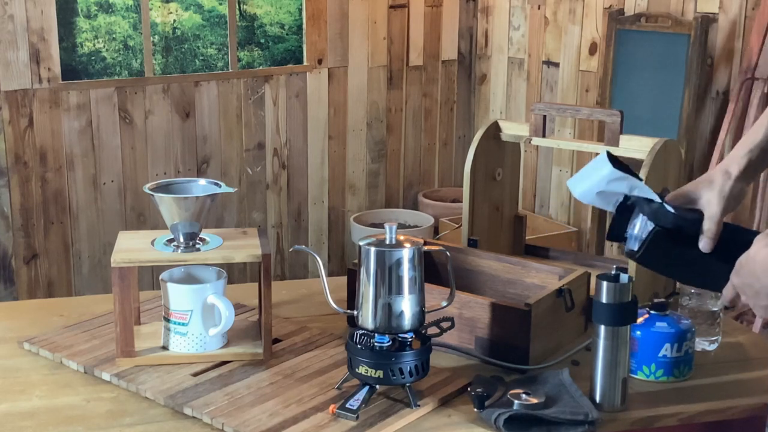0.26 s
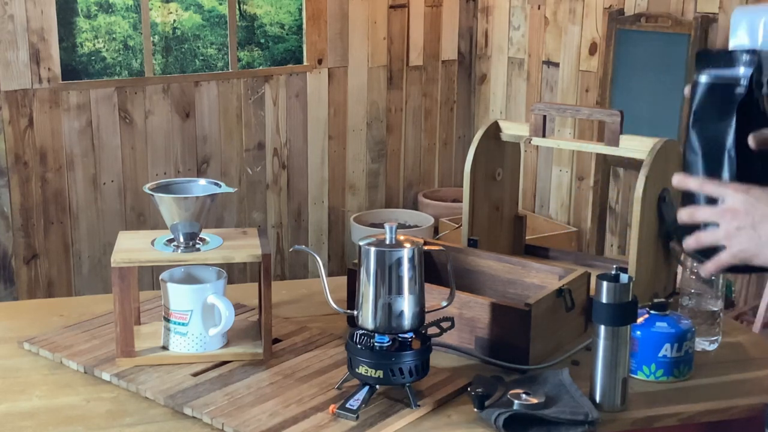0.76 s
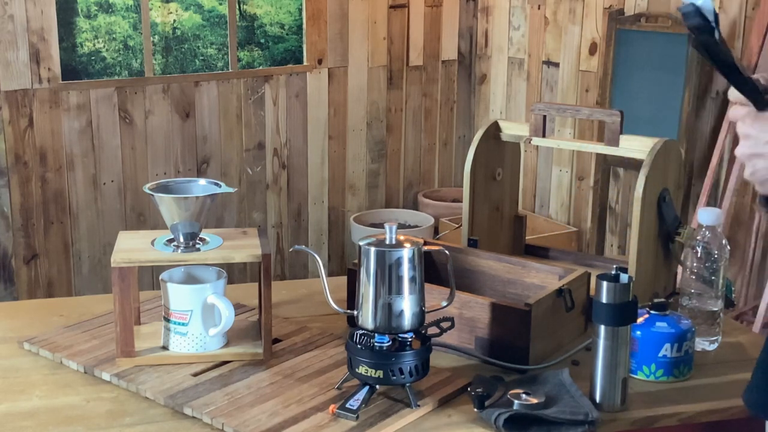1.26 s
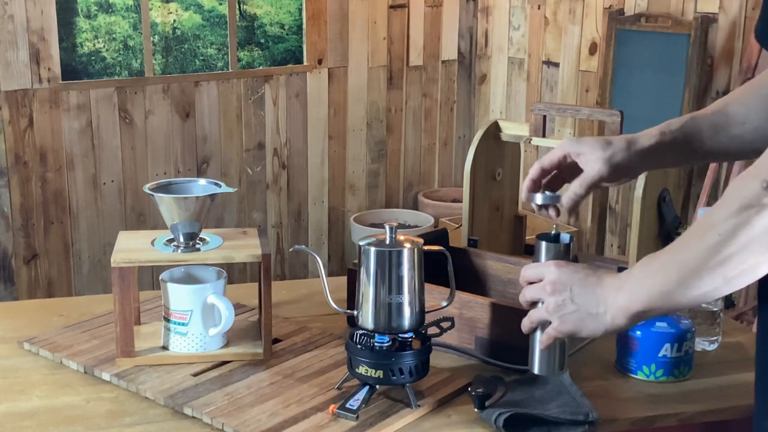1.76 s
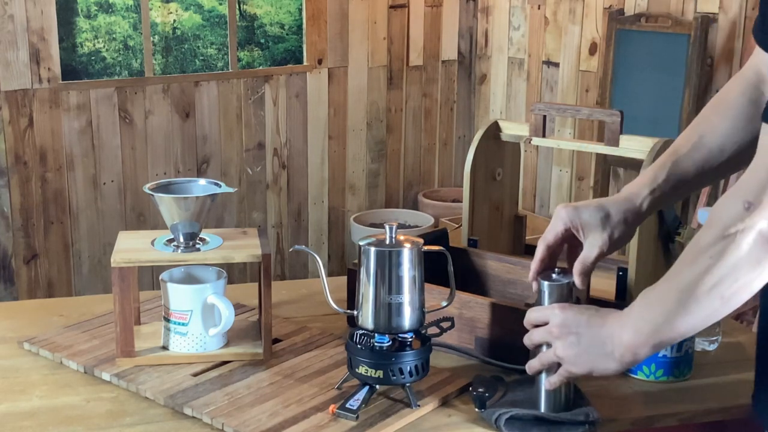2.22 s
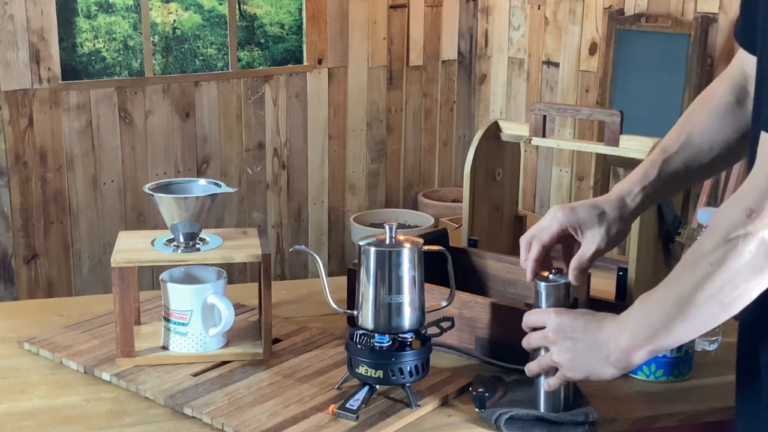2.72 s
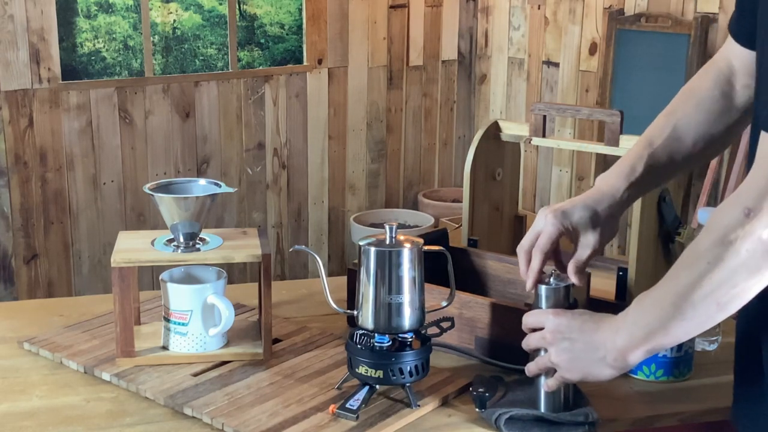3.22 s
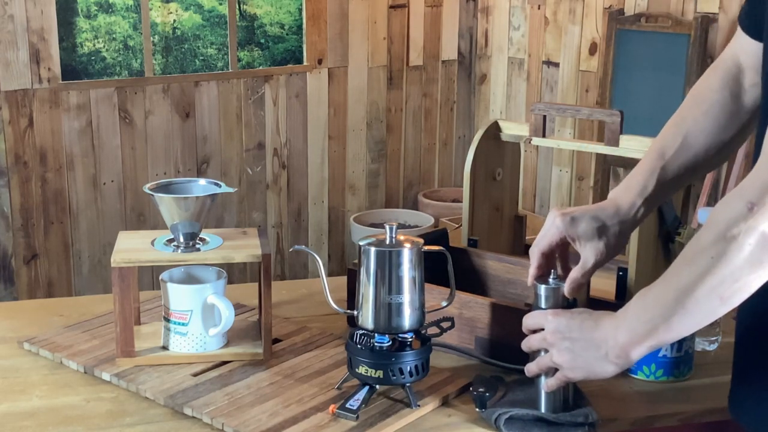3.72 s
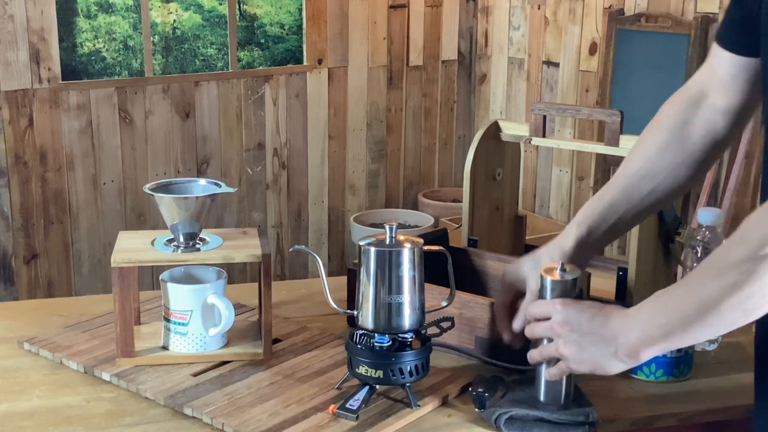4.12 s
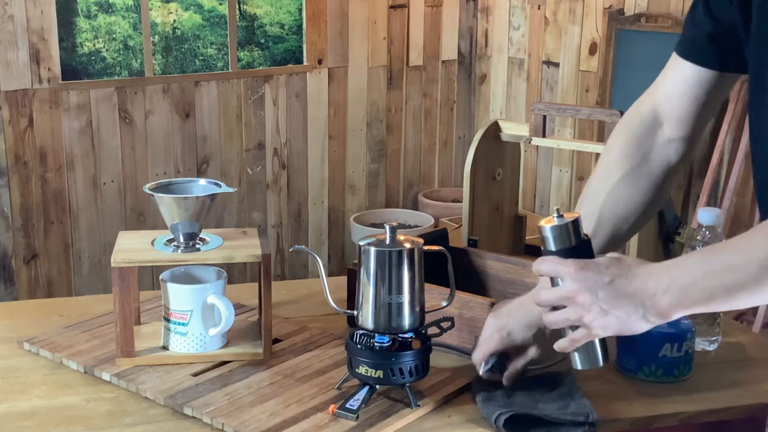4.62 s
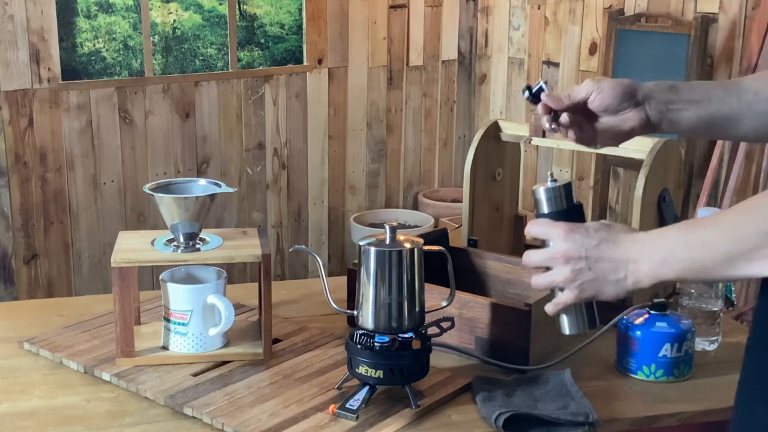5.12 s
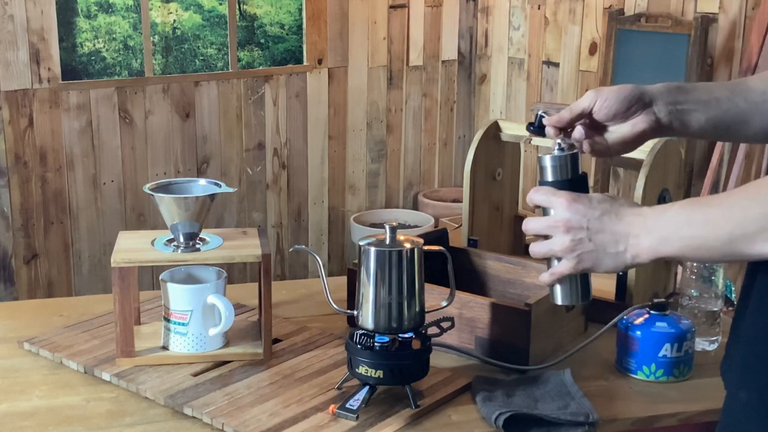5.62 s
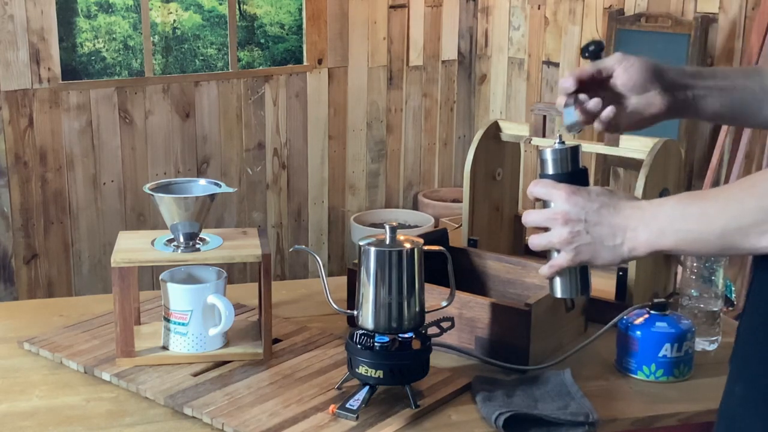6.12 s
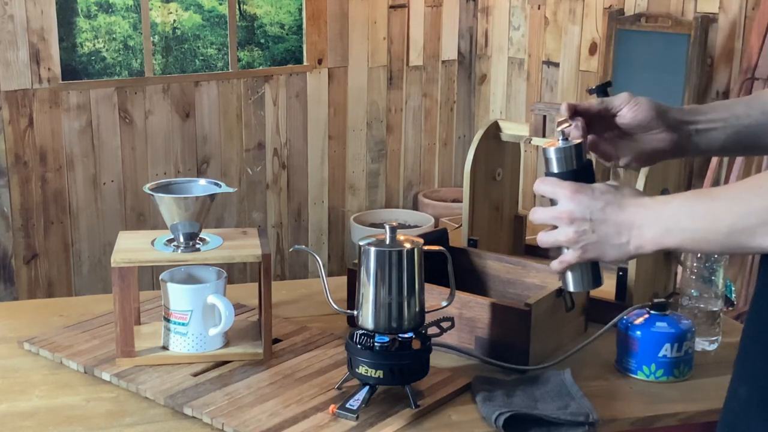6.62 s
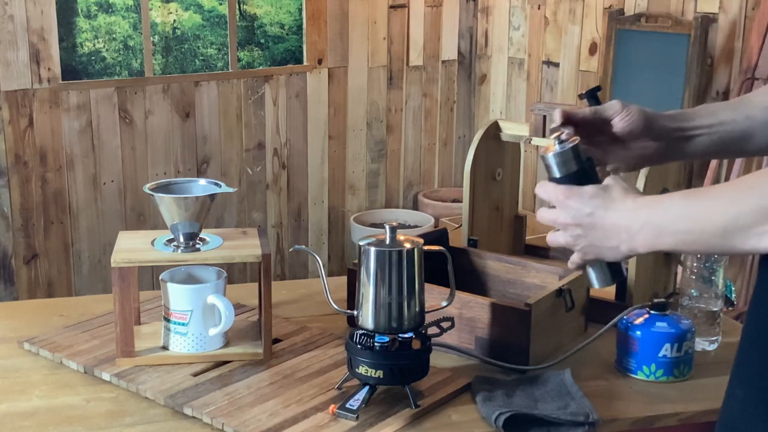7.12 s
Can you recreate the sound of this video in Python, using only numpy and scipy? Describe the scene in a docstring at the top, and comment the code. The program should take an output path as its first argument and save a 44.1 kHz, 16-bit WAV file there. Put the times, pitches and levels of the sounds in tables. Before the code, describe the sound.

Coffee beans rush down a foil bag, the bag crinkles sharply and cuts off, then a metal grinder lid scrapes, clicks and its crank clinks on.

```python
"""Coffee bag and hand grinder

Beans slide down a foil-lined bag as it is tipped upright: filtered trains of tiny impacts. The bag crinkles
in runs of snaps until its sound cuts off. A steel lid is then fitted on a grinder and its crank clinked onto
the shaft: noisy contacts excite banks of dying modes. A small wood-panelled room adds random echoes; under
it all lie steady rumble and faint hiss, with a brief low tone at the start. Both channels are alike."""
import sys
import numpy as np
from scipy import signal
from scipy.io import wavfile
from scipy.ndimage import uniform_filter1d

SR = 44100
rng = np.random.default_rng(int(sys.argv[2]) if len(sys.argv) > 2 else 0)


def dump(signal):
    """Clip the signal to [-1, 1] and save it as 16-bit WAV at the path in sys.argv[1]."""
    limited = np.clip(np.atleast_2d(signal).T, -1, 1)
    pcm = np.round(limited * 32767).astype(np.int16)
    wavfile.write(sys.argv[1], SR, pcm)


N = 324576
TIME = np.arange(N) / SR

# Spectrum of the lid touching the tube. Each row: frequency in Hz, relative level in dB.
LID_CONTACT_SPECTRUM = [(300, -41), (850, 1), (1500, -0.5), (2000, 3.5), (2400, 3), (2850, 2.5),
                        (3500, 0.5), (4600, 2.5), (6000, -2.5), (7000, -8), (9500, -15.5), (12000, -19),
                        (15500, -28)]
# Modes of lid and tube. Each row: frequency in Hz, T60 in s, relative level in dB while loose, in dB once seated.
LID_TUBE_MODES = [(1270, 0.048, -1.5, -24), (2900, 0.031, -3.5, -7), (4030, 0.066, 9.5, -20),
                  (4480, .03, -12, 7), (5910, 0.066, -18, 4), (8340, .04, -7, -27), (8500, .35, -44, 2.5),
                  (9420, 0.055, -9, -17), (11050, 0.19, -18, 1), (14000, .05, -15, -17),
                  (14920, .02, -40, 1)]
# Spectrum of the wooden table. Each row: frequency in Hz, relative level in dB.
TABLE_SPECTRUM = [(110, 3), (200, 2), (280, -2.5), (450, -5.5), (780, 1), (1100, -3), (1600, -36),
                  (4000, -31)]
RING_FOLLOWS_TILT = 0.4  # share of the contact's tilt passed on to the lid's modes


def beans():
    """Beans tumble in clumps and tick; the steeper the bag, the more they hiss on foil and drum on its bottom."""
    # Bean impact spectrum. Each row: frequency in Hz, relative level in dB.
    bean_spectrum = [(250, -7), (450, -8), (750, -1.5), (1100, -3), (1500, -5.5), (2200, -5.5), (3200, -14),
                     (5500, -14), (7000, -20), (13500, -21.5), (16000, -28)]
    # Growing surges of beans. Each row: start in seconds, length in seconds, flow level in dB.
    surges = [(.39, .01, -46.5), (.515, 0.02, -36), (.665, 0.03, -33)]
    # Tilt of the bag. Each row: time in seconds, share from 0 (lying) to 1 (upright).
    tipping = [(.5, 0.14), (.72, 1)]
    # dB relative to the flow: bag lying, bag upright; the hiss reaches this at the peak flow
    hiss_db, drum_db = (-22, -12.5), (-13, -5.5)
    hiss_growth = 0.2  # extra dB of hiss per dB of flow

    flow = strokes(surges, rise_db_per_s=90, fall_db_per_s=120)
    upright = np.interp(TIME, *np.transpose(tipping))
    bunching = clumps(depth_db=2.0, size=500)

    tick_grains = colour(grains(per_s=2200, spread_db=3.0), bean_spectrum)
    ticks = unit(bunching * band(tick_grains, 770, 6050))

    hiss_grains = colour(grains(per_s=4300, spread_db=3.0), bean_spectrum)
    hiss = unit(band(hiss_grains, 7500, 16400)) * (flow / flow.max()) ** hiss_growth

    drum_grains = colour(grains(per_s=1200, spread_db=-1), bean_spectrum)
    drum = unit(bunching * band(drum_grains, 230, 900))

    hiss_gain = amp(between(hiss_db, upright))
    drum_gain = amp(between(drum_db, upright))
    return flow * (amp(-3.5) * ticks + hiss_gain * hiss + drum_gain * drum)


def bag():
    """Stiff foil buckles in short runs of snaps, a fold setting off its neighbours, over fine crinkles."""
    # Foil spectrum. Each row: frequency in Hz, relative level in dB.
    foil_spectrum = [(200, -7), (500, -3.5), (750, 0.5), (1200, 1.5), (2100, 1), (3000, -2.5), (5300, -3.5),
                     (6600, -11.5), (10000, -17), (15500, -26.5)]
    # Snap runs. Each row: start in seconds, level in dB before trim, tilt in dB per octave, count of snaps.
    snap_runs = [(0.067, -46.5, 8.5, 1), (0.3224, -52, -6, 1), (.852, -32.5, -3.5, 2),
                 (0.9151, -34, -1.5, 2), (.9503, -30, -1.5, 1), (1.0837, -34.5, -1.5, 1),
                 (1.123, -36.5, -1, 1), (1.131, -32.5, -1.5, 1), (1.155, -28, 1, 1),
                 (1.1834, -25.5, 2.5, 3), (1.2447, -31.5, -2, 1), (1.2551, -31, 1, 1), (1.373, -33.5, 2, 2),
                 (1.455, -36, 3, 1), (1.463, -29.5, 1.5, 1), (1.476, -35, 5.5, 1)]
    # Squeezes by the hands. Each row: start in seconds, length in seconds, crinkle level in dB.
    squeezes = [(.945, .09, -41.5), (1.15, 0.1, -42.5), (1.378, 0.023, -45.5), (1.47, 0.009, -43),
                (1.565, .03, -47)]
    gap_s, step_db, trim_db = 0.0105, -2, -4.0  # from snap to snap in a run; all snaps

    bunching = clumps(depth_db=2.5, size=350)
    crinkles = unit(bunching * colour(grains(per_s=1200, spread_db=3), foil_spectrum))
    out = crinkles * strokes(squeezes, rise_db_per_s=224, fall_db_per_s=150)
    for s, db, tilt_db, count in snap_runs:
        for k in range(round(count)):
            snap = contact(foil_spectrum, tilt_db, chatter_s=0.0034, rough=2.9)
            add(out, s + k * gap_s, amp(db + trim_db + k * step_db) * snap)
    return out


def lid():
    """The lid knocks on the tube, rubs round and clicks home; its ring changes as it goes down."""
    # Depth of the lid. Each row: time in seconds, share from 0 (loose) to 1 (seated).
    seating = [(2.0, 0.1), (2.8, 0.34), (3.3, 0.96)]
    # Turns. Each row: start in seconds, length in seconds, touch level in dB, rub level at the end in dB,
    # ring in dB relative to touch or rub; contact and rub parts are trimmed later.
    turns = [(1.868, 0.024, -59, -61.5, 1), (1.966, 0.011, -46, -39.5, 1), (2.0545, .03, -44, -52, -9.5),
             (2.1435, 0.046, -46, -53.5, -10), (2.562, .04, -49.5, -63, -24),
             (2.6838, 0.092, -50.5, -53.5, -13.5), (2.8156, 0.044, -46.5, -46.5, -7)]
    # The rim slips down a step. Each row: start in seconds, level in dB before trim, tilt in dB per octave.
    clicks = [(1.9188, -38, 9.5), (1.986, -41.5, 12), (2.864, -43, 2), (3.314, -50.5, -3), (3.3241, -42, 7)]
    touch_tilt_db = -8.5  # per octave: the first touch is dull
    click_ring_db = (-8, -6)  # relative to the click: loose, seated

    out = np.zeros(N)
    for s, length_s, touch_db, rub_db, ring_db in turns:
        seated = np.interp(s, *np.transpose(seating))
        add(out, s, knock(touch_db, touch_tilt_db, ring_db, seated))
        add(out, s, rub(length_s, rub_db, ring_db, seated))
    for s, db, tilt_db in clicks:
        seated = np.interp(s, *np.transpose(seating))
        add(out, s, knock(db, tilt_db, between(click_ring_db, seated), seated))
    return out


def knock(db, tilt_db, ring_db, seated):
    """The lid strikes the tube: a tick, the tube's ring and a table thud that grows as the lid seats."""
    thud_db = between((-22, -1.1), seated)  # relative to db
    # only a dull contact tilts the ring
    out = amp(db + ring_db) * ring(LID_TUBE_MODES, seated, RING_FOLLOWS_TILT * min(tilt_db, 0))
    tick = contact(LID_CONTACT_SPECTRUM, tilt_db, chatter_s=0.013, rough=2.0)
    thud = contact(TABLE_SPECTRUM, 0, chatter_s=0.008, rough=0.87)
    add(out, 0, amp(db - 4.0) * tick)
    add(out, 0, amp(db + thud_db) * thud)
    return out


def rub(length_s, db, ring_db, seated, count=2, size=8000):
    """The turning rim slips at two points and rings the tube, louder and louder until the hand lets go."""
    build_db, fall_db_per_s = 5.5, 700
    firm_db, brightening = -44, 0.43  # no tilt at firm_db; dB per octave for each dB above it
    detune = 0.0067  # the moving point of contact shifts the modes by this share

    t = np.arange(size) / SR
    tilt_db = brightening * (db - firm_db)
    build = build_db * np.minimum(t / length_s - 1, 0)
    release = fall_db_per_s * np.maximum(t - length_s, 0)
    press = amp(db + build - release)

    slips = [grains(per_s=280, spread_db=2.5, size=size) for _ in range(count)]
    squeak = np.zeros(size)
    for point in slips:
        tube = ring(LID_TUBE_MODES, seated, RING_FOLLOWS_TILT * tilt_db, detune=detune)
        squeak += signal.oaconvolve(point, tube)[:size]
    scratch = unit(colour(sum(slips), LID_CONTACT_SPECTRUM, tilt_db))
    return press * (amp(-4.5) * scratch + amp(ring_db - 3.0) * unit(squeak))


def crank():
    """Steel on steel: ticks and rings that depend on the place struck, soft scrapes, knocks on the shaft."""
    # Clinks. Each row: start in seconds, contact level in dB, tilt in dB per octave, ring level in dB,
    # place struck from 0 (knob end) to 1 (socket end).
    clinks = [(4.6468, -60.5, -6, -67, 0.27), (4.694, -49, 12, -65, 0), (4.6972, -43, 4, -39, 0),
              (4.757, -62, -14, -52, 0), (5.3807, -39.5, 1.5, -35.5, 0.95),
              (5.9814, -45, 1.5, -46.5, 0.016), (6.004, -55, -5, -48, 0.037),
              (6.338, -41, 3.5, -38.5, 0.74), (6.7299, -44.5, 0, -62, 0.79),
              (6.8284, -43.5, -0.5, -46, 0.85), (6.834, -37.5, -2.5, -41.5, 0.36),
              (7.3467, -60.5, 1, -77, 0.55)]
    # Contact spectrum. Each row: frequency in Hz, relative level in dB at the knob end, in dB at the socket end.
    contact_spectrum = [(261, -10, -17), (600, -5, -10), (950, -4, 3), (1630, -4, -8), (2420, 2, 6.5),
                        (3000, -2, -2.5), (4300, -0.5, -0.5), (5900, 4.5, 0.5), (7420, -10.5, -7),
                        (8900, -15, -14), (10000, -49, -8), (11500, -31, -3), (15400, -28, -3)]
    # Crank modes. Each row: frequency in Hz, T60 in s, relative level in dB struck at the knob end, in dB at
    # the socket end.
    steel_modes = [(2397, 0.054, -19, -9), (3845, 0.1, -7, -13), (5800, 0.039, -11, -6),
                   (5700, 0.055, -15, 3), (6000, 0.063, 1.5, -6.5), (6093, 0.032, 6, -34),
                   (8330, 0.014, -21, 0.5), (8660, 0.19, -8.5, -14.5), (11680, 0.057, -46, 3.5),
                   (13300, .025, -39, -26), (14920, 0.032, -25, -18), (15600, .035, -25, -26)]
    # Knob sliding on its pin, then socket over shaft. Each row: start in seconds, length in seconds,
    # level in dB before trim.
    scrape_rows = [(5.88, .03, -54), (5.985, .015, -62), (6.595, .025, -54), (6.75, 0.081, -54.5)]
    # Socket knocking the shaft. Each row: start in seconds, level in dB.
    shaft_knocks = [(6.73, -42), (6.834, -45)]
    # Shaft modes. Each row: frequency in Hz, T60 in s, relative level in dB.
    shaft_modes = [(2550, .014, -4), (3100, 0.022, 0), (4070, 0.012, -3), (4360, 0.02, 4), (5250, .02, -2),
                   (15200, .02, -16)]
    knob_sharpening = 0.0185  # struck at the knob end, the crank rings higher by this share

    hz, knob_db, socket_db = np.transpose(contact_spectrum)
    scrape = unit(colour(grains(per_s=1300, spread_db=4.0), np.c_[hz, knob_db]))
    out = scrape * strokes(scrape_rows, rise_db_per_s=300, fall_db_per_s=500) * amp(-4.5)
    for s, db, tilt_db, ring_db, place in list(clinks) + rattle():
        touch = np.c_[hz, between((knob_db, socket_db), place)]
        pitch = between((1 + knob_sharpening, 1), place)
        add(out, s, amp(db) * contact(touch, tilt_db, chatter_s=0.0033, rough=4.2))
        add(out, s, amp(ring_db) * ring(steel_modes, place, pitch=pitch))
    for s, db in shaft_knocks:
        add(out, s, amp(db) * ring(shaft_modes, 0))
    return out


def rattle(tilt_db=-1.0, ring_db=1.0, place=0.18, count=5):
    """The loose knob's even touches as the crank is turned over, each harder, as rows of clinks."""
    start_s, gap_s, first_db, step_db = 5.7987, 0.0245, -53.5, 1.2
    rows = []
    for k in range(count):
        db = first_db + k * step_db
        rows.append((start_s + k * gap_s, db, tilt_db, db + ring_db, place))
    return rows


def brush():
    """The hand brushes the table as it reaches for the crank: noise shaped to a soft, woody rustle."""
    # Each row: start in seconds, length in seconds, level in dB.
    brush_rows = [(4.44, 0.029, -58)]
    rustle = band(colour(rng.standard_normal(N), TABLE_SPECTRUM), 120, 2500)
    return unit(rustle) * strokes(brush_rows, rise_db_per_s=400, fall_db_per_s=150)


def room(source, wet_db, count=3):
    """Each wall gets a source with its own fine pattern and answers with its own echoes."""
    walls = sum(signal.oaconvolve(source(), echoes(wet_db))[:N] for _ in range(count))
    return source() + walls / np.sqrt(count)


def echoes(wet_db, count=8):
    """Reflections from the table and nearby things, plus a diffuse tail decaying at its own rate per frequency."""
    # Each row: frequency in Hz, T60 in s.
    decay_times = [(200, 0.55), (1000, 0.47), (3000, 0.68), (6000, 0.52), (10000, 0.49), (15000, 0.38)]
    taps = rng.choice([-1., 1.], SR) * (rng.random(SR) < 6000 / SR)
    taps[:round(.006 * SR)] = 0
    hz, t, z = signal.stft(taps, SR, nperseg=256)
    decay = amp(-60 * t / read(decay_times, hz)[:, None])
    tail = signal.istft(z * decay, SR, nperseg=256)[1]
    response = amp(wet_db) * tail / np.linalg.norm(tail)
    delays = (SR * rng.uniform(.002, .018, count)).astype(int)
    response[delays] += 0.19 * rng.choice([-1, 1], count)
    return response


def background(drone_hz=147):
    """Steady filtered-noise rumble and faint hiss, and a brief low tone with its octave."""
    # Rumble spectrum. Each row: frequency in Hz, relative level in dB.
    rumble_spectrum = [(52, -17), (62, -4.5), (85, -4.5), (120, -9.5), (160, -1), (200, -3), (260, -0.5),
                       (350, -3.5), (450, -8.5), (600, -7), (740, -16), (950, -6.5), (1150, -11.5),
                       (1500, -20), (2200, -34), (4000, -84)]
    # Hiss spectrum. Each row: frequency in Hz, relative level in dB.
    hiss_spectrum = [(1000, -31), (1400, 1.5), (2300, 0), (3000, -11), (4600, -15), (5500, 1.5),
                     (6000, -7.5), (6800, -23), (10000, -23.5), (13000, -21), (15500, -33)]
    rumble_db, hiss_db = -54.5, -67.5
    drone_db, drone_end_s, drone_fall_db_per_s = -56.5, 0.17, 290  # rms of the fundamental

    rumble = amp(rumble_db) * unit(colour(rng.standard_normal(N), rumble_spectrum, size=8192))
    hiss = amp(hiss_db) * unit(colour(rng.standard_normal(N), hiss_spectrum))
    phase = 2 * np.pi * drone_hz * TIME
    tone = np.sqrt(2) * (np.sin(phase) + amp(-5.5) * np.sin(2 * phase))
    fade_db = drone_fall_db_per_s * np.maximum(TIME - drone_end_s, 0)
    return rumble + hiss + amp(drone_db - fade_db) * tone


def contact(points, tilt_db, chatter_s, rough, rise_s=0.00053, size=3000):
    """One sharp touch with a short noisy chatter, filtered to the surfaces' spectrum."""
    t = np.arange(size) / SR
    envelope = np.exp(-t / chatter_s) * (1 - np.exp(-t / rise_s))
    force = rough * blow(rng.standard_normal(size) * envelope)
    force[:1] += blow(np.ones(1))
    return blow(colour(force, points, tilt_db))


def ring(modes, blend, tilt_db=0, pitch=1, detune=0.004, size=8000):
    """Dying modes, levels blended between the table's level columns and tilted about 3 kHz."""
    t = np.arange(size) / SR
    hz, t60, *db = np.transpose(modes)[:, :, None]
    hz = hz * pitch * (1 + detune * rng.standard_normal(hz.shape))  # the grip shifts each mode a little
    level_db = between((db[0], db[-1]), blend) + tilt_db * np.log2(hz / 3000)
    strength = amp(level_db) / np.sqrt(t60)
    partials = strength * amp(-60 * t / t60) * np.sin(2 * np.pi * hz * t)
    return blow(np.sum(partials, 0))


def grains(per_s, spread_db, size=N):
    """A random train of tiny impacts with exponentially spread levels in dB."""
    strength = amp(spread_db * np.minimum(rng.exponential(1, size), 4))
    return strength * rng.choice([-1, 1], size) * (rng.random(size) < per_s / SR)


def clumps(depth_db, size):
    """Random bunching of grains: a gain that wanders from moment to moment."""
    return amp(depth_db * unit(uniform_filter1d(rng.standard_normal(N), size=size)))


def strokes(rows, rise_db_per_s, fall_db_per_s):
    """Gain over time: each (start s, length s, dB) swells up to its start, holds and fades; the loudest wins."""
    levels_db = []
    for s, length_s, db in rows:
        rise_db = rise_db_per_s * np.maximum(s - TIME, 0)
        fall_db = fall_db_per_s * np.maximum(TIME - s - length_s, 0)
        levels_db.append(db - rise_db - fall_db)
    return amp(np.maximum(np.max(levels_db, 0), -150))


def colour(x, points, tilt_db=0, size=2048):
    """Minimum-phase filter with the given spectrum, tilted about 3 kHz, falling off below its lowest point."""
    hz = abs(np.fft.fftfreq(size, 1 / SR)) + 1
    tilt = tilt_db * np.log2(np.maximum(hz, 500) / 3000)
    low_cut = 24 * np.minimum(np.log2(hz / points[0][0]), 0)
    db = read(points, hz) + tilt + low_cut
    log_gain = np.log(amp(np.maximum(db, -100)))
    impulse = np.fft.ifft(np.exp(np.conj(signal.hilbert(log_gain)))).real
    return signal.oaconvolve(x, impulse)[:len(x)]


def band(x, lo_hz, hi_hz):
    """Butterworth band-pass."""
    sos = signal.butter(2, [lo_hz, min(hi_hz, .49 * SR)], "band", fs=SR, output="sos")
    return signal.sosfilt(sos, x)


def read(points, hz):
    """Reads a table on a log-frequency axis."""
    f, value = np.transpose(points)
    return np.interp(np.log(hz + 1), np.log(f + 1), value)


def between(ends, share):
    """Goes from the first value to the second as the share goes from 0 to 1."""
    return ends[0] + np.clip(share, 0, 1) * (ends[1] - ends[0])


def amp(db):
    """Converts dB to amplitude."""
    return 10 ** (np.asarray(db) / 20)


def unit(x):
    """Scales to an rms of one."""
    return x / np.sqrt(np.mean(x ** 2) + 1e-20)


def blow(x):
    """Scales to the energy of 10 ms at an rms of one."""
    return x * np.sqrt(.01 * SR / np.sum(x ** 2))


def add(mix, s, sound):
    """Adds a sound in place at s seconds, clipped to the mix's end."""
    part = mix[round(s * SR):][:len(sound)]
    part += sound[:len(part)]


def scene():
    """The bag stops abruptly, echo and all; then the grinder is put together."""
    bag_end_s, fade_s = 1.592, 0.004
    before_cut = np.clip((bag_end_s - TIME) / fade_s, 0, 1)
    pouring = room(lambda: beans() + bag(), wet_db=-1.0) * before_cut
    mono = pouring + room(lid, wet_db=-2.0) + room(crank, wet_db=-1.5) + brush() + background()
    return np.array([mono, mono])


def record(dry, edge_hz=16100):
    """Band limit: a steep linear-phase low-pass."""
    lowpass = signal.firwin(511, edge_hz, window=("kaiser", 9), fs=SR)
    return signal.oaconvolve(dry, lowpass[None], "same")


dry = scene()
out = record(dry)
dump(out)
```